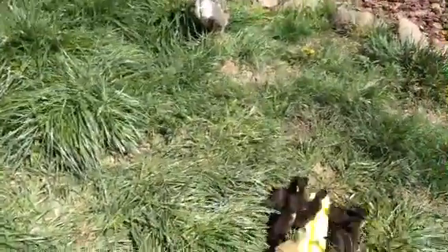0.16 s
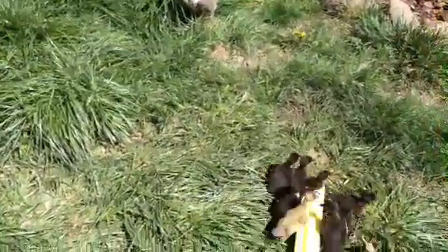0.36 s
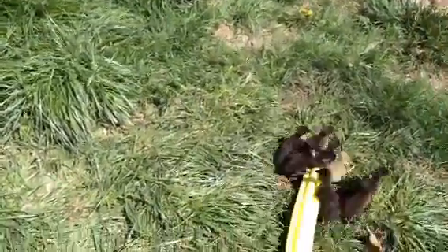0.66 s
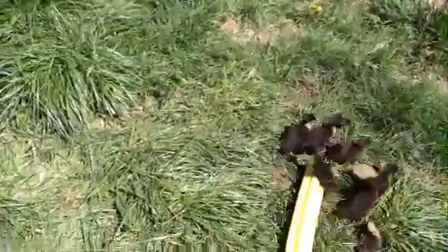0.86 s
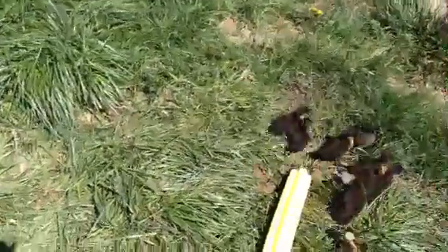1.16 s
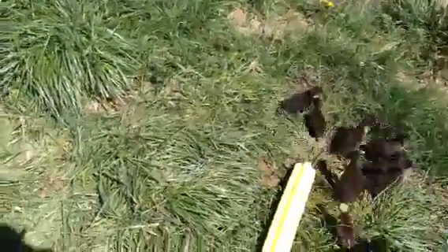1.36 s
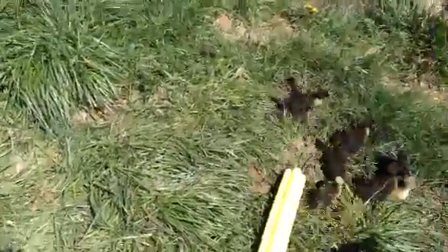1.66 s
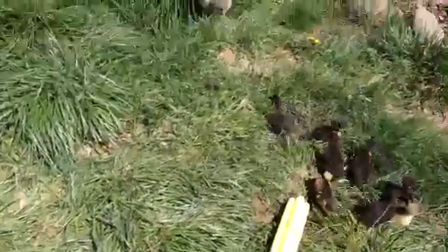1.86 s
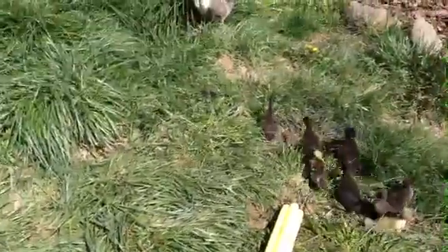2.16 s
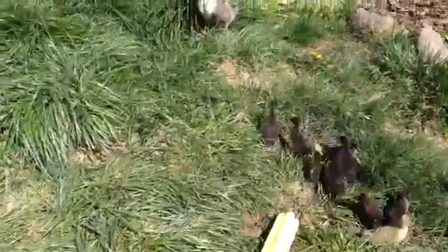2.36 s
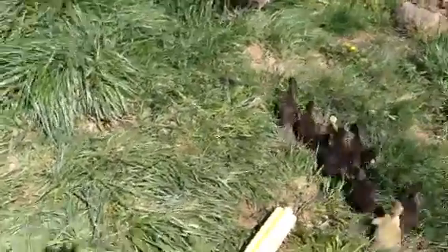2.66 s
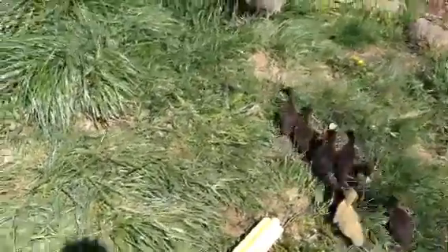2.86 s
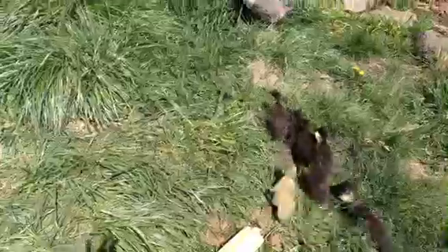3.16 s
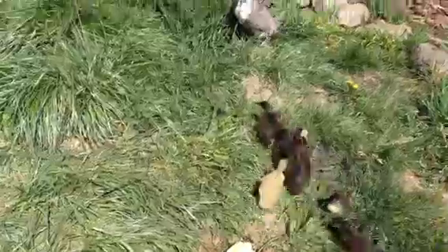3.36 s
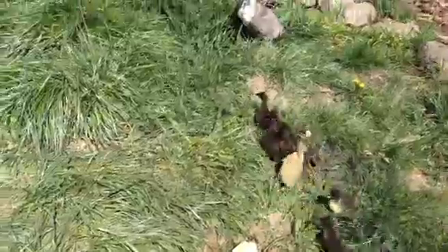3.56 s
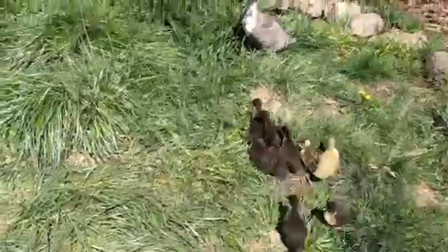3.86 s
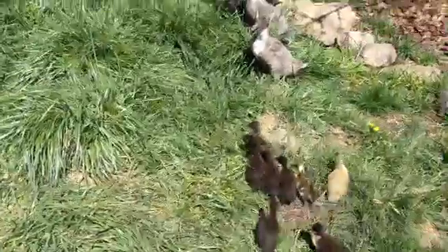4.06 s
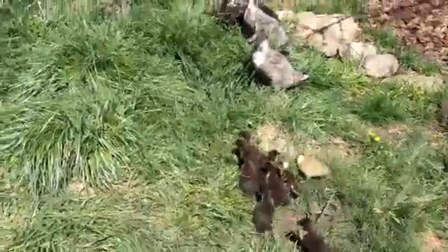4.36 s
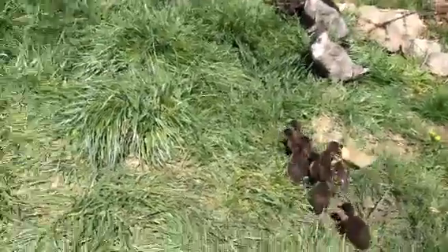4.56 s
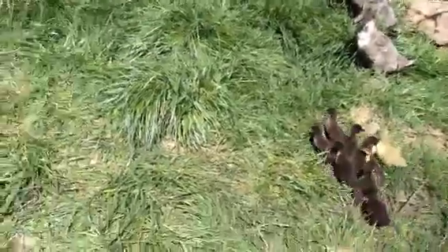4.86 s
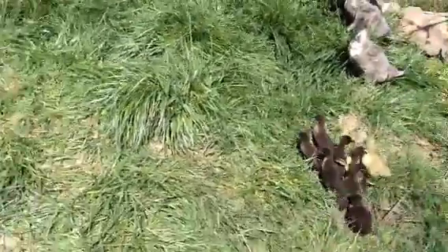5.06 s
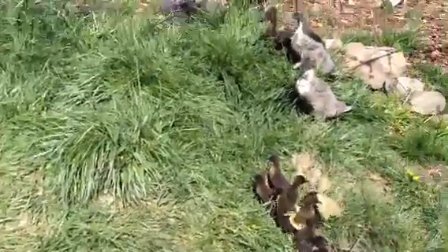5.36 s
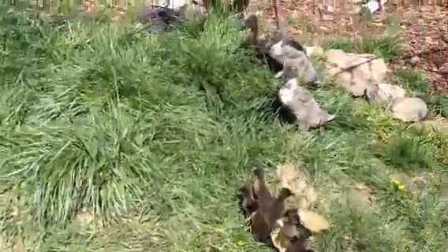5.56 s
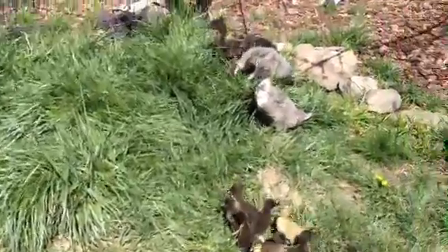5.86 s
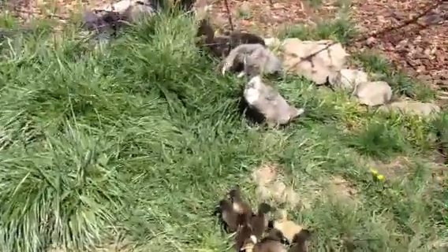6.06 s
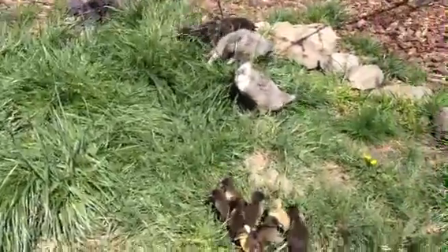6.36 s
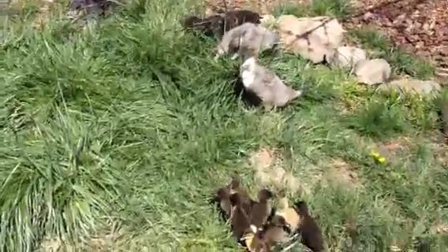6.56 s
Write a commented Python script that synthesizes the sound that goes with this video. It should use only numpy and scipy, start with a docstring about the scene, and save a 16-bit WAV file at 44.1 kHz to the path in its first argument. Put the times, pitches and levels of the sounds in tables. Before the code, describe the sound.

Ducklings give loud piercing peeps and soft pips outdoors while grass rustles and snaps, then dull handling thumps and rough little chirps follow.

```python
"""Ducklings on a lawn

Ducklings peep while a plastic bat nudges them through the grass; a hand rubs and bumps the camera.
Birds: two trembling sines per syrinx give long peeps and rough chirps; one sine gives pips and whistles.
Grass: shaped granular noise under stroke and snap envelopes. Hand: shaped noise plus damped sine knocks.
Garden: a faint wall echo and scattered noise tail follow the birds, over steady hum and hiss.
"""
import sys
import numpy as np
from scipy import signal
from scipy.fft import rfft, irfft, next_fast_len
from scipy.io import wavfile
from scipy.ndimage import map_coordinates

SR = 44100
rng = np.random.default_rng(int(sys.argv[2]) if len(sys.argv) > 2 else 0)


def file_out(sig):
    """Save sig as 16-bit WAV at sys.argv[1]."""
    # one column per channel
    cols = np.atleast_2d(sig).T
    # limit, then scale
    lim = np.clip(cols, -1, 1)
    pcm = np.round(lim * 32767).astype(np.int16)
    wavfile.write(sys.argv[1], SR, pcm)


N = 296352
TIME = np.arange(N) / SR

# Levels are nominal, before the trims and swells in the functions; spectra are relative shapes.
# stirring of the grass: (time [s], level [dB])
GRASS_STIR = [(0.0, -60), (0.34, -58.5), (0.69, -53.5), (0.8, -52), (0.95, -58.5), (1.52, -63.5),
              (1.83, -63), (2.11, -68), (4.01, -59.5), (4.15, -61.5), (4.45, -73), (4.88, -63.5),
              (5.8, -73), (6.72, -62.5)]
# spectrum of leaf blades: (frequency [Hz], relative level [dB])
BLADE_SPECTRUM = [(180, -48.5), (300, -7), (620, -5), (781, -4), (1120, -4), (1810, -3), (1970, -2),
                  (3280, -8), (4210, -7), (5210, -13.5), (7880, -4), (10100, -13), (14500, -11.5),
                  (15500, -14.5)]
# spectrum of stalk bodies: (frequency [Hz], relative level [dB])
STALK_SPECTRUM = [(200, -44.5), (550, -11.5), (1000, -11.5), (1750, -1), (2800, -20), (5000, -24),
                  (12000, -50.5)]
# spectrum of snaps: (frequency [Hz], relative level [dB])
SNAP_SPECTRUM = [(500, -7.5), (2400, 4), (4100, -35), (5200, -13), (7800, 4), (10500, -11), (15000, -7)]
# strokes through the grass: (time [s], nominal length [s], blade level [dB], stalk level [dB])
GRASS_STROKES = [(0.084, 0.0344, -50.5, -57), (0.571, 0.171, -46.5, -49), (0.723, 0.0567, -49.5, -42),
                 (1.796, 0.0723, -50, -55), (1.89, 0.0743, -49.5, -81), (2.354, 0.18, -58.5, -75.5),
                 (4.334, 0.123, -55, -55.5), (6.357, 0.0225, -49, -84.5), (6.39, 0.1606, -55.5, -82.5)]
# snapping stalks: (time [s], crack level [dB], stalk body relative to crack [dB])
STALK_SNAPS = [(0.0268, -31, -19), (0.303, -38, 1.5), (.3774, -31, -23.5), (0.4941, -30.5, -10.5),
               (.601, -28, -11.5), (0.7273, -29, -4.5), (0.8796, -31.5, -4), (0.9062, -34, 0.5),
               (0.9494, -32.5, -17), (0.965, -35, -1.5), (1.035, -37, -4), (1.3641, -39, -18),
               (1.903, -47.5, -19), (3.778, -55.5, 23.5), (3.893, -33.5, -6), (3.929, -33.5, -29),
               (4.09, -39, -22), (4.1312, -47.5, 16.5), (4.9568, -40.5, -14), (5.7662, -42.5, -20)]
# hand rubbing the case: (time [s], level [dB])
HAND_RUB = [(0.0, -66.5), (0.84, -63.5), (1.03, -66.5), (1.5, -71), (2.6, -69), (2.9, -60.5), (3.74, -71),
            (4.13, -63), (4.32, -55.5), (4.6, -56.5), (4.94, -50), (5.35, -64), (6.06, -71.5),
            (6.72, -63.5)]
# spectrum of the rubbed case: (frequency [Hz], relative level [dB])
CASE_SPECTRUM = [(15, -71.5), (25, -42), (65, -13), (104, -3.5), (169, 1), (339, -12.5), (395, -14),
                 (522, -41.5), (700, -40.5), (910, -62), (1540, -120)]
# hand bumping the camera: (time [s], peak level [dB], pitch [Hz])
CASE_BUMPS = [(.8, -47.5, 139), (2.684, -47.5, 136), (3.046, -38, 128.5), (3.074, -42.5, 194),
              (3.689, -40.5, 126.5), (4.18, -41.5, 134), (4.261, -40.5, 150), (4.341, -34, 162.8),
              (4.357, -34.5, 169.3), (4.719, -34, 183.3), (4.78, -32.5, 148.2), (4.802, -31.5, 304.8),
              (4.818, -31.5, 194.5), (4.846, -31, 203), (4.866, -30, 163.4), (4.918, -36.5, 223.5),
              (4.961, -36.5, 174.2), (5.052, -37.5, 174), (5.097, -26.5, 164.4), (5.12, -30.5, 185),
              (5.127, -31.5, 255.3)]
# spectrum of the garden air: (frequency [Hz], relative level [dB])
AIR_SPECTRUM = [(15, -49.5), (25, -46.5), (43, -24.5), (140, -10), (289, 7), (631, -3.5), (1110, -8),
                (1950, -10.5), (2490, -5.5), (3530, -11.5), (5280, -17.5), (8130, -10), (10100, -13.5),
                (14300, -18), (15500, -12)]
# passband of the throat: (frequency [Hz], gain [dB])
THROAT_GAIN = [(600, -2), (1300, -2), (1600, 0.5), (2950, -3), (3150, -10), (3400, -6.5), (4500, -33)]
# long peeps: (start [s], full low voice [s], end [s], low voice [Hz], high voice [Hz],
#              low level [dB], high level [dB]); pitches are those at full effort, midway from crest to end
LONG_PEEPS = [(0.049, 0.116, .226, 1979, 2448, -35.5, -42), (0.416, 0.479, .578, 1997, 2465, -33.5, -39),
              (3.227, 3.309, 3.416, 1945, 2330, -30.5, -39.5), (3.58, 3.633, 3.745, 2001, 2364, -30, -37),
              (3.927, 3.987, 4.094, 1982, 2340, -31.5, -37),
              (4.347, 4.421, 4.513, 1963, 2364, -35.5, -37.5)]
# rough chirps: (time [s], length [s], low voice top [Hz], high voice top [Hz],
#                low level [dB], high level [dB])
ROUGH_CHIRPS = [(1.245, 0.0583, 1731, 2583, -53.5, -51.5), (1.468, 0.0753, 1800, 2782, -53.5, -52),
                (2.944, 0.0588, 1890, 2866, -59, -45.5), (4.636, 0.0711, 1849, 3041, -47, -39),
                (5.13, 0.0824, 1737, 2735, -51.5, -49), (5.18, 0.063, 1857, 3070, -57.5, -55.5),
                (5.33, 0.0903, 1866, 2988, -46.5, -45), (5.538, .085, 1881, 2991, -45, -44.5),
                (6.012, 0.0754, 1673, 2873, -49.5, -49.5), (6.207, 0.0911, 1832, 3029, -44, -45),
                (6.414, 0.0874, 1870, 3088, -43.5, -44.5)]
# brood pips: (time [s], length [s], apex pitch [Hz], apex place [share of length], level [dB]);
# a negative place lies before the onset: the pip only falls
BROOD_PIPS = [(1.641, 0.069, 3350, 0.92, -61), (2.005, 0.045, 2910, 0.462, -58.5),
              (2.14, 0.0523, 2934, 0.52, -62), (2.295, 0.0506, 2770, 0.504, -59.5),
              (2.366, 0.049, 2765, 0.47, -60.5), (2.559, 0.0372, 2580, 0.526, -60),
              (2.655, 0.066, 3051, -0.436, -57), (2.679, 0.04807, 2471, 0.48, -61.5),
              (2.737, .085, 2675, 0.472, -57), (2.817, .08, 3240, 0.52, -63.5),
              (3.136, 0.0362, 2700, 0.47, -58), (3.153, .043, 3353, -0.4, -60.5),
              (3.39, 0.063, 3105, .45, -53.5), (3.465, 0.0392, 3114, 0.57, -54.5),
              (3.459, .05, 3682, 0.46, -55.5), (3.767, 0.063, 3580, 0.24, -58),
              (3.844, 0.061, 2520, 0.52, -58), (4.084, 0.0516, 3401, -0.47, -52.5),
              (4.269, 0.0565, 2726, 0.434, -61), (4.572, 0.076, 2750, .5, -60.5),
              (4.884, 0.0564, 2750, .55, -65.5), (4.94, 0.0378, 2772, 0.37, -57.5),
              (5.027, 0.1056, 2787, 0.48, -58), (5.269, 0.0414, 3030, 0.49, -57.5),
              (5.449, 0.0438, 3400, -0.51, -57), (5.752, 0.1217, 3075, 0.48, -61),
              (5.978, 0.032, 2792, -0.65, -59.5), (6.187, 0.042, 3540, 0.33, -65),
              (6.34, 0.022, 3010, -0.42, -55.5), (6.537, 0.0264, 2750, -0.185, -55),
              (6.659, 0.0183, 2085, 1, -50.5)]
# low whistles, some swelling: (time [s], length [s], apex pitch [Hz], apex place [share of length],
#                               final level [dB], swell [dB])
LOW_WHISTLES = [(2.376, 0.1097, 1831, 0.49, -57, 1), (2.9, 0.0644, 1900, 0.98, -33.5, 24),
                (4.972, .165, 1998, .75, -48, 9.5), (5.767, 0.058, 1864, .5, -61.5, 0)]


def amp(db):
    """Decibels to gain."""
    return 10 ** (np.asarray(db) / 20)


def unit(x):
    """x at rms 1."""
    return x / np.sqrt(np.mean(x ** 2) + 1e-20)


def curves(rows, at):
    """Columns after the first, linearly interpolated over the first."""
    key, *cols = np.transpose(rows)
    return [np.interp(at, key, c) for c in cols]


def wobble(knots_per_s, size):
    """Smooth random curve: spline through Gaussian knots."""
    knots = rng.standard_normal(int(size * knots_per_s / SR) + 4)
    return map_coordinates(knots, [np.arange(size) * knots_per_s / SR + 1])


def filtered(x, response):
    """x times a gain over frequency [Hz]."""
    m = next_fast_len(N + 8192)
    return irfft(rfft(x, m) * response(np.fft.rfftfreq(m, 1 / SR)), m)[:N]


def coloured(x, spectrum):
    """x shaped by a spectrum joined over log frequency, at rms 1."""
    f, db = np.transpose(spectrum)
    return unit(filtered(x, lambda hz: amp(np.interp(np.log(hz + 1), np.log(f), db))))


def add(track, start_s, sound):
    """Mix sound into track in place."""
    part = track[max(round(start_s * SR), 0):][:len(sound)]
    part += sound[:len(part)]


def crackle(spread_db, knots_per_s):
    """Noise in fine grains: white noise under a fast random level."""
    return rng.standard_normal(N) * amp(spread_db * wobble(knots_per_s, N))


def grass():
    """Blades rustle under small feet and swish under the bat; stalks snap as short decaying bursts."""
    stir_db, = curves(GRASS_STIR, TIME)
    blades, stalks, cracks = np.zeros((3, N))
    for start_s, length_s, blade_db, stalk_db in GRASS_STROKES:
        since = np.arange(int(2 * length_s * SR)) / SR
        bend = np.minimum(since / (0.306 * length_s), 1)
        spring_back = amp(-38 * np.maximum(since / length_s - .75, 0))
        stroke = bend * spring_back
        add(blades, start_s, amp(blade_db) * stroke)
        add(stalks, start_s, amp(stalk_db) * stroke)

    t = np.arange(SR // 16) / SR
    snap = (1 - np.exp(-t / .0003)) * amp(-60 * t / .013)
    for start_s, crack_db, body_db in STALK_SNAPS:
        add(cracks, start_s, amp(crack_db - 3.0) * snap)
        add(stalks, start_s, amp(crack_db + body_db - 5.5) * snap)
    # single dry blades flick, 22 a second on average, following the stir level
    flicks = (rng.random(N) < 22 / SR) * rng.uniform(.3, 1, N)
    cracks = cracks + amp(stir_db + 6.5) * signal.fftconvolve(flicks, snap)[:N]

    clumps = amp(1.59 * wobble(45, N))  # blades catch and slip in bunches
    stir = amp(stir_db + 2.0) * coloured(crackle(spread_db=1.5, knots_per_s=730), BLADE_SPECTRUM)
    leafy = blades * coloured(crackle(spread_db=-1, knots_per_s=520), BLADE_SPECTRUM)
    woody = stalks * coloured(crackle(spread_db=-0.5, knots_per_s=230), STALK_SPECTRUM)
    snaps = cracks * coloured(crackle(spread_db=-1, knots_per_s=670), SNAP_SPECTRUM)
    return clumps * (stir + leafy + woody) + snaps


def handling(corner_hz, t60_s):
    """Rubbing is case-shaped noise; knocks are damped sines, high-passed as the mic passes no deep bass."""
    taps_per_s, tap_over_rub_db, tap_centre_hz = 14, 6, 165.9
    rub_db, = curves(HAND_RUB, TIME)
    slip = amp(2 * wobble(35, N))
    track = amp(rub_db - 1.0) * slip * coloured(rng.standard_normal(N), CASE_SPECTRUM)

    taps = []  # lighter finger taps at random times
    for when, hard, high in rng.random((int(taps_per_s * N / SR), 3)):
        at = int(when * N)
        tap_db = rub_db[at] + tap_over_rub_db + 6 * (hard - .5)
        taps.append((TIME[at], tap_db, tap_centre_hz * 2 ** (high - .5)))

    t = np.arange(SR // 12) / SR
    envelope = (1 - np.exp(-t / 0.00089)) ** 2 * amp(-60 * t / t60_s)
    bass_cut = signal.butter(3, corner_hz, "high", fs=SR, output="sos")
    for start_s, peak_db, hz in CASE_BUMPS + taps:
        knock = signal.sosfilt(bass_cut, np.sin(2 * np.pi * hz * t) * envelope)
        add(track, start_s, amp(peak_db - 1) * knock / abs(knock).max())
    return track


def air():
    """Quiet garden hum and hiss: shaped noise at a slowly wandering level."""
    return amp(-64 + 0.77 * wobble(3.67, N)) * coloured(rng.standard_normal(N), AIR_SPECTRUM)


def voice(hz, rough, jitter, flutter_hz):
    """One side of the syrinx: a sine of trembling pitch, its membrane fluttering when rough."""
    size = len(hz)
    phase = 2 * np.pi * np.cumsum(hz * (1 + jitter * wobble(261.16, size))) / SR
    in_phase = wobble(flutter_hz, size) * np.sin(phase)
    quadrature = wobble(flutter_hz, size) * np.cos(phase)
    flutter = (in_phase + quadrature) / np.sqrt(2)
    return np.sqrt(2) * (np.sin(phase) + rough * flutter) / np.sqrt(1 + rough ** 2)


def syrinx(both, square_db, cube_db, hiss_db):
    """Both voices share one throat: passband, sum tones and overtones from distortion, and hiss."""
    gain_db, = curves(THROAT_GAIN, np.fft.rfftfreq(SR // 2, 1 / SR))
    both = irfft(rfft(both, SR // 2) * amp(gain_db))[:len(both)]
    size = np.sqrt(np.mean(both ** 2))
    u = both / size
    overtone_cut = signal.butter(4, 3400, "high", fs=SR, output="sos")
    overtones = signal.sosfilt(overtone_cut, amp(square_db) * u ** 2 + amp(cube_db) * u ** 3)
    hiss_band = signal.butter(2, [5600, 8800], "band", fs=SR, output="sos")
    hiss = unit(signal.sosfilt(hiss_band, rng.standard_normal(len(u))))
    breath = amp(hiss_db) * hiss * abs(signal.hilbert(u))
    return size * (u + overtones + breath) * signal.windows.tukey(len(u), .08)


def peeps():
    """High voice sweeps up over a faint low rasp; the low voice breaks in, pulls it down and beats with it."""
    crest_hz, crest_lead_s, rise_share = 2913.7, 0.0153, 0.32  # crest precedes full low voice
    entry_s, scoop_share, sag_share = .026, 0.21, .075  # low voice scoops up, sags toward full effort
    release_s, drop_share = 0.03544, 0.255
    low_idle_db, low_idle_rough, low_release_db = -22.5, 1.25, 13
    high_rise_db, high_swell_db, high_release_db = 18, 14, 34.5
    out = np.zeros(N)
    for start, full, end, low_hz, high_hz, low_db, high_db in LONG_PEEPS:
        t = np.arange(start, end, 1 / SR)
        crest = full - crest_lead_s
        rising = np.interp(t, [start, crest], [1, 0]) ** 2
        waiting = np.interp(t, [full - entry_s, full], [1, 0])
        held = np.interp(t, [crest, end], [0, 1])
        effort = np.sin(np.pi * held)
        release = np.interp(t, [end - release_s, end], [0, 1])
        drop = drop_share * release ** 3

        scoop = scoop_share * (waiting ** 2 + rising / 3)
        low_pitch = low_hz * (1 + sag_share * (1 - effort) - scoop - drop)
        high_pitch = crest_hz * (1 - rise_share * rising - drop) - effort * (crest_hz - high_hz)

        low_swell = low_idle_db * waiting - 2 * (1 - effort) - low_release_db * release ** 2
        high_swell = high_swell_db * (held ** 2 - .2) - high_rise_db * rising - high_release_db * release
        low_level = amp(low_db + low_swell + 1.1 * wobble(120, len(t)))
        high_level = amp(high_db + high_swell + 0.35 * wobble(88.5, len(t)))

        low_rough = .07 + low_idle_rough * waiting ** 3
        low = low_level * voice(low_pitch, low_rough, jitter=.005, flutter_hz=700)
        high = high_level * voice(high_pitch, .42 - .2 * effort, jitter=.009, flutter_hz=800)
        # beat tones above and below the pair
        over = voice(2 * high_pitch - low_pitch, rough=0.78, jitter=0.0152, flutter_hz=517.7)
        under = voice(2 * low_pitch - high_pitch, rough=1.0, jitter=0.0081, flutter_hz=501)
        over_beat = amp(-13.5 + low_swell / 2) * high_level * over
        under_beat = amp(-24 + low_swell / 2) * high_level * under
        both = low + high + over_beat + under_beat
        add(out, start, syrinx(both, square_db=-32, cube_db=-48.5, hiss_db=-37.5))
    return out


def garden_echoes(x, near_db, wall_db, tail_db, wall_s, t60_s):
    """Ground and stones scatter at once, a wall reflects later, shrubs leave a short noise tail."""
    t = np.arange(SR // 2) / SR

    def scatter(envelope):
        """Noise under an envelope, at unit energy."""
        return unit(rng.standard_normal(len(t)) * envelope) / np.sqrt(len(t))

    near = amp(near_db) * scatter((t > .003) * amp(-60 * t / 0.0347))
    tail = amp(tail_db) * scatter((t > .015) * amp(-60 * t / t60_s))
    answer = near + tail
    answer[round(wall_s * SR)] += amp(wall_db)
    return x + signal.fftconvolve(x, answer)[:N]


def chirps():
    """Both voices arch quickly and roughen at the top, where a rasp fills the gap between them."""
    low_droop_share, high_droop_share = 0.2644, .36  # arch ends below its top
    low_fade_db, high_fade_db = 42, 18.5  # arch ends weaker
    top_rough, choke_db = 0.856, 5.5  # roughness chokes the low voice
    out = np.zeros(N)
    for start_s, length_s, low_hz, high_hz, low_db, high_db in ROUGH_CHIRPS:
        edge = np.linspace(-1, 1, int(length_s * SR)) ** 2  # 0 at the top, 1 at the ends
        rough = top_rough * (1 - edge) ** 2
        low_pitch = low_hz * (1 - low_droop_share * edge ** 1.7626)
        high_pitch = high_hz * (1 - high_droop_share * edge)
        mid_pitch = (low_pitch + high_pitch) / 2
        low_level_db = low_db + 4.0 - choke_db * rough - low_fade_db * edge ** 5
        high_level_db = high_db + 2.5 - high_fade_db * edge ** 1.14

        low = amp(low_level_db) * voice(low_pitch, 1.1 * rough, jitter=.03, flutter_hz=800)
        high = amp(high_level_db) * voice(high_pitch, .6 * rough, jitter=.014, flutter_hz=600)
        rasp = voice(mid_pitch, rough=2, jitter=.02, flutter_hz=700)
        difference = voice(high_pitch - low_pitch, rough=2, jitter=.03, flutter_hz=500)
        both = low + high + rough * (amp(high_level_db - 4) * rasp + amp(high_level_db - 18) * difference)
        add(out, start_s, syrinx(both, square_db=-26, cube_db=-29.5, hiss_db=-34))
    return out


def whistle(length_s, apex_hz, apex_at, droop_share, last_db, swell_db):
    """One voice draws a parabolic pitch arch, a little weaker where it is high."""
    u = np.linspace(0, 1, int(length_s * SR))
    hz = apex_hz * (1 - droop_share * ((u - apex_at) / max(apex_at, 1 - apex_at)) ** 2)
    db = last_db - swell_db * (1 - u) + np.interp(hz, [2700, 3600], [0, -3])
    tone = voice(hz, rough=.15, jitter=.006, flutter_hz=600)
    return amp(db) * signal.windows.tukey(len(u), .18) * tone


def pips():
    """Brood contact calls: soft single-voice pips, random fainter ones, and a few low whistles."""
    pip_droop, whistle_droop = .34, .21  # shares of the apex pitch
    out = np.zeros(N)
    for start_s, length_s, apex_hz, apex_at, db in BROOD_PIPS:
        add(out, start_s, whistle(length_s, apex_hz, apex_at, pip_droop, db, swell_db=0))
    for when, long, high, loud in rng.uniform(-1.1, 1, size=(14, 4)):
        start_s = np.interp(when, [-1, 1], [2, 6.6])  # while the brood is on the move
        length_s, apex_hz = .05 * (1 + 0.34 * long), 2780 * (1 + .17 * high)
        add(out, start_s, whistle(length_s, apex_hz, 0.4, pip_droop, -68 + 2 * loud, swell_db=0))
    for start_s, length_s, apex_hz, apex_at, last_db, swell_db in LOW_WHISTLES:
        add(out, start_s, whistle(length_s, apex_hz, apex_at, whistle_droop, last_db, swell_db))
    return out


def scene():
    """Sum of grass, hand, air, and birds with their echoes."""
    calls = peeps() + chirps() + pips()
    birds = garden_echoes(calls, near_db=-6, wall_db=-21, tail_db=-9.5, wall_s=0.051, t60_s=0.291)
    return (birds + grass() + handling(corner_hz=95, t60_s=0.0462) + air())[None]


def record(dry):
    """Camera band limit: nothing from 15.6 kHz up."""
    return filtered(dry[0], lambda hz: hz < 15600)[None]


dry = scene()
out = record(dry)
file_out(out)
```